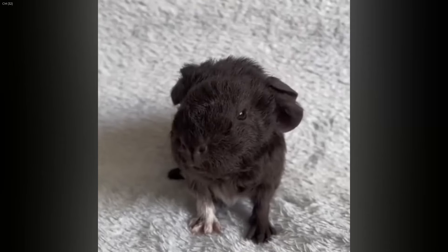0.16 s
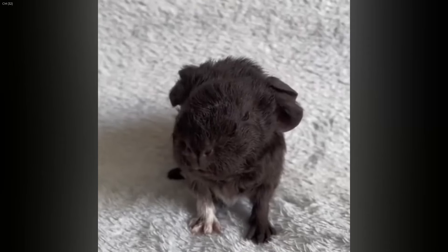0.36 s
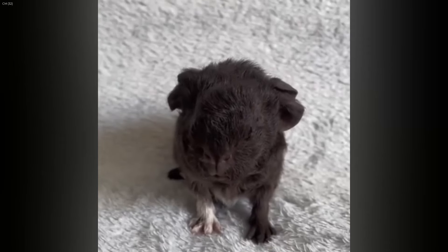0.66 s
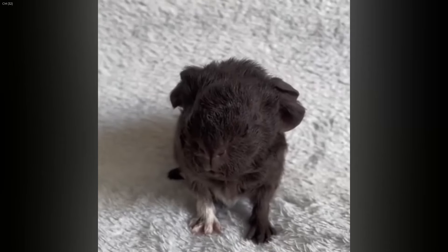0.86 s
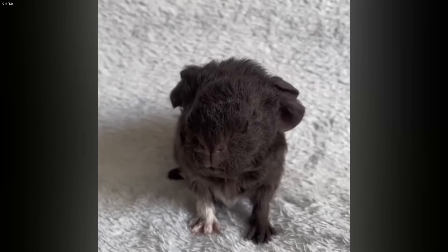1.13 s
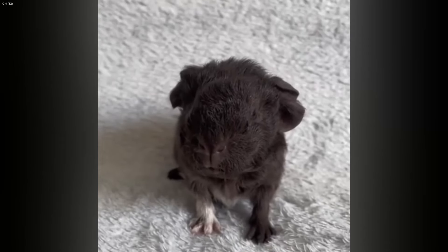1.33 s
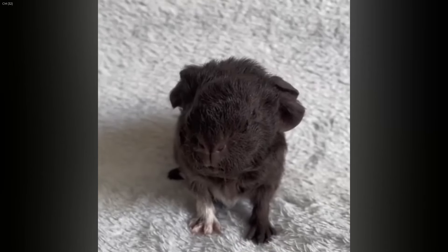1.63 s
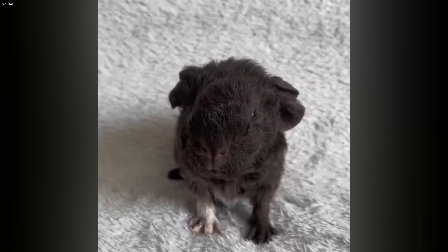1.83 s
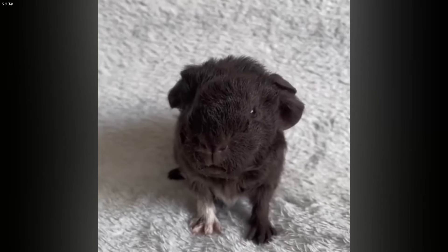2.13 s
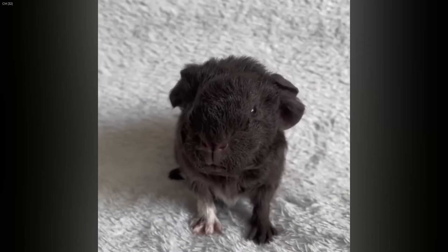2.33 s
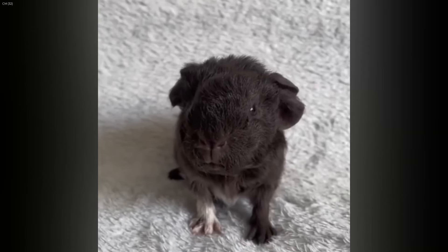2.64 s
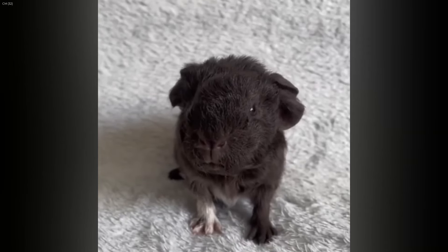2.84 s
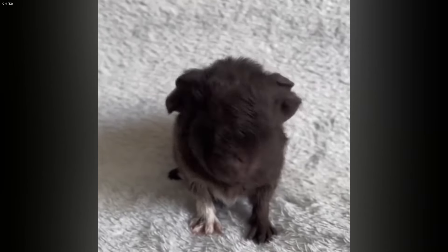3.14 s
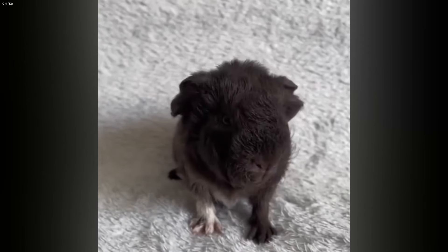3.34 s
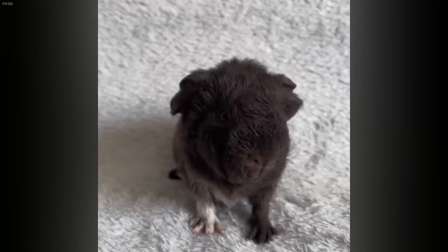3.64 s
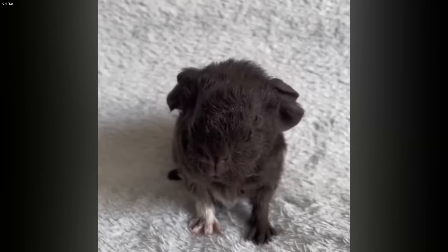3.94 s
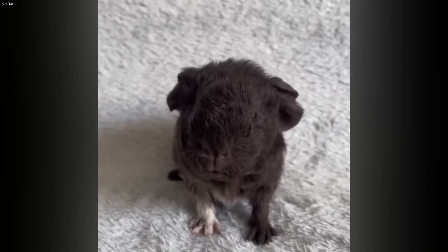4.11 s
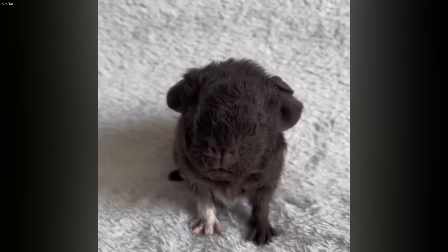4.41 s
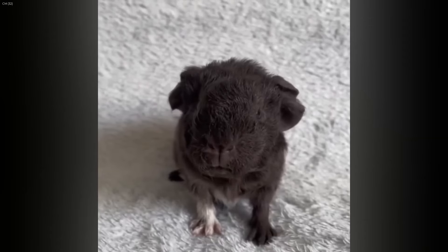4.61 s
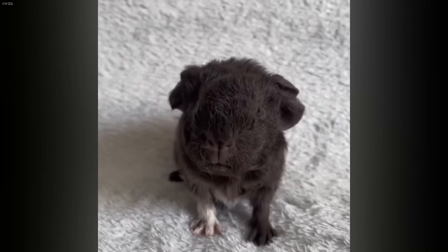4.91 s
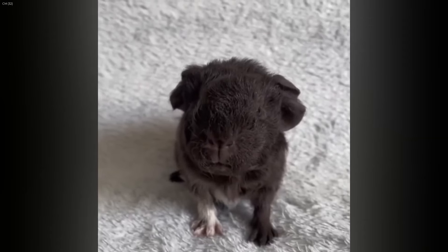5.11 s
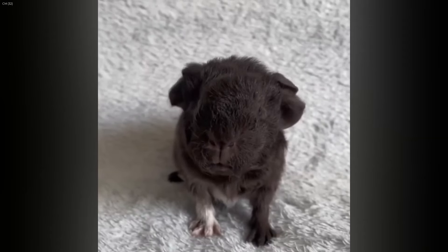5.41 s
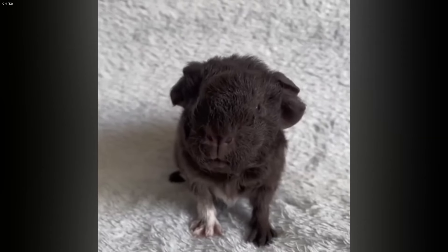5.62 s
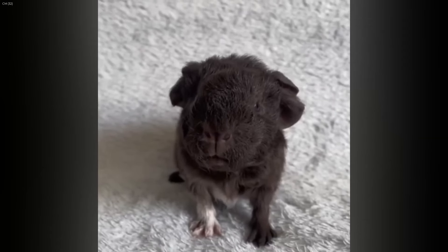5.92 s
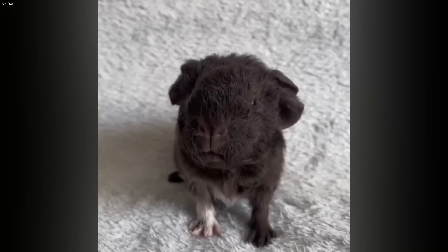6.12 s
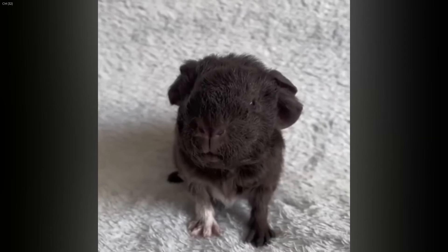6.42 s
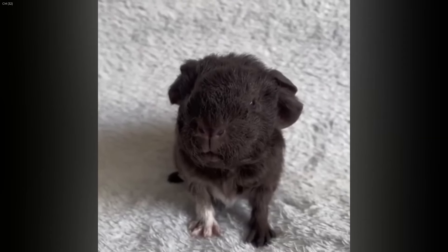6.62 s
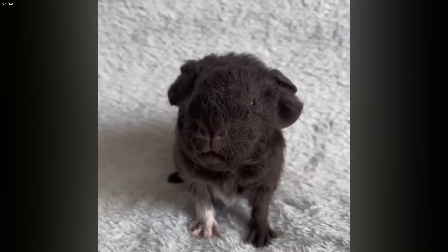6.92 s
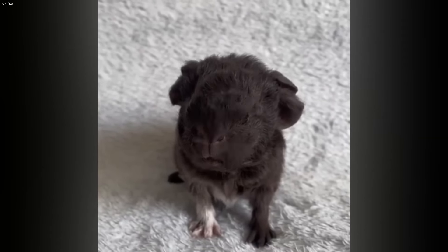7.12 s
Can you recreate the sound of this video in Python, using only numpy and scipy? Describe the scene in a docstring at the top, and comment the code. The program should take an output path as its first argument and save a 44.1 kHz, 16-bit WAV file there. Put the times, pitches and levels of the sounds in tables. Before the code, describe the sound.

A guinea pig on a soft blanket wheeks insistently, close to the microphone, over three times a second. Each call starts as a low nasal buzz, rasps briefly upward and locks into a thin, bright whistle. Around one to two seconds the calls weaken and fall back, then strengthen again, with one short break near three seconds. Faint low hum and a very short, dry room tail.

```python
"""Guinea pig wheeking on a blanket

A guinea pig wheeks over three times a second, close by in a quiet room.
Each wheek is one voice tone led along a pitch curve: a low nasal buzz rich in overtones
sweeps up through a noisy rasp into a thin, almost pure whistle; some fall back again.
Chirps, low notes, narrow bands of high noise, steady high tones and soft bumps join in.
Random reflections make the short room tail; sines and noise make the low hum and room tone."""
import sys
import numpy as np
from scipy import signal
from scipy.fft import rfft, irfft, next_fast_len
from scipy.io import wavfile
from scipy.ndimage import uniform_filter1d

SR = 44100
rng = np.random.default_rng(int(sys.argv[2]) if len(sys.argv) > 2 else 0)


def int16_out(signal):
    """Quantize to a 16-bit WAV file."""
    q = np.round(np.clip(np.atleast_2d(signal).T, -1, 1) * 32767)
    wavfile.write(sys.argv[1], SR, q.astype(np.int16))


N = 319983
EDGE_HZ = 15900  # upper limit of the overtones and of the final sound


def gain_of(db):
    """Turns decibels into an amplitude factor."""
    return 10 ** (np.asarray(db) / 20)


def evened(x):
    """Scales a sound to an average (rms) strength of 1."""
    return x / np.sqrt(np.mean(x ** 2) + 1e-20)


def read(points, hz, order=1):
    """Reads one column of a frequency table, in straight lines over log frequency."""
    columns = np.transpose(points)
    return np.interp(np.log(hz + 1), np.log(columns[0] + 1), columns[order])


def add(mix, s, sound):
    """Adds a sound into the mix at a time in seconds."""
    part = mix[max(round(s * SR), 0):][:len(sound)]
    part += sound[:len(part)]


def coloured(x, gain):
    """Filters a sound by a gain that depends on frequency."""
    size = next_fast_len(len(x) + SR // 20)
    spectrum = rfft(x, size) * gain(np.fft.rfftfreq(size, 1 / SR))
    return irfft(spectrum, size)[:len(x)]


def wobble(count, rate_hz):
    """Smooth random movement of rms 1, mostly slower than the rate."""
    noise = rng.standard_normal(count)
    return evened(coloured(noise, lambda f: np.exp(-(f / rate_hz) ** 2)))


def band(count, centre_hz, width_hz):
    """Noise of rms 1 gathered around one frequency, like a steep resonance."""
    noise = rng.standard_normal(count)
    return evened(coloured(noise, lambda f: (1 + ((f - centre_hz) / width_hz) ** 2) ** -2))


def background(waver=0.44, drift_radians=0.82, side_share=0.65):
    """Steady noise with low sines that waver in strength and phase; its bass is alike in both ears."""
    # noise of the room, middle part: (frequency [Hz], level [dB per Hz])
    room_tone = [(30, -99), (58, -78.5), (80, -87), (150, -87), (200, -97), (270, -91.5), (330, -103),
                 (450, -107), (1000, -119), (4000, -124), (7000, -135)]
    # hum of the room: (pitch [Hz], level before wavering [dB])
    hum = [(47.7, -54), (108, -71.5), (148, -72.5)]
    t = np.arange(N) / SR
    tone = lambda f: gain_of(read(room_tone, f)) * np.sqrt(SR / 2)
    mid = coloured(rng.standard_normal(N), tone)
    for hz, db in hum:
        phase = 2 * np.pi * hz * t + drift_radians * wobble(N, 5.6)
        strength = 1 + waver * wobble(N, 4.9)
        mid += np.sqrt(2) * gain_of(db) * strength * np.sin(phase)
    # the difference between the ears has little bass
    side_gain = lambda f: tone(f) * f ** 4 / (f ** 4 + 260 ** 4)
    side = side_share * coloured(rng.standard_normal(N), side_gain)
    return np.array([mid + side, mid - side])


def slipped(t):
    """The factor by which brief cracks in the voice bend its pitch at these times."""
    # slips of the voice: (middle [s], half-length [s], pitch change [share])
    slips = [(0.158, 0.0073, -0.042), (0.169, 0.00885, -0.036), (0.446, 0.006, 0.063),
             (0.8, 0.00404, -0.12), (0.807, 0.00665, 0.191), (1.3373, 0.009, 0.29), (1.389, 0.00804, 0.174),
             (1.593, 0.00482, 0.34), (1.717, 0.00636, 0.068), (2.207, 0.0054, 0.074),
             (2.235, 0.0167, -0.0222), (2.264, 0.0057, -0.016), (2.505, 0.00375, 0.024),
             (2.55, 0.0078, -0.0476), (2.813, 0.00573, 0.052), (2.846, 0.00735, -0.023),
             (3.25, 0.00824, 0.058), (3.291, 0.0036, -0.068), (3.578, 0.00915, -0.072),
             (3.9, 0.0074, -0.0055), (4.162, 0.0039, .018), (4.169, 0.00775, -0.021), (4.456, 0.012, .08),
             (4.516, 0.0101, -0.031), (5.051, 0.0028, -0.152), (5.308, 0.00603, -0.14),
             (5.422, 0.00376, 0.0565), (5.668, 0.00705, 0.021), (5.688, 0.0162, -0.1595),
             (6.774, 0.0056, 0.000042), (6.776, 0.00903, -0.078), (7.08, 0.0138, 0.0407),
             (7.115, 0.0093, -0.0069)]
    return 1 + sum(share * np.exp(-np.abs((t - s) / half) ** 3) for s, half, share in slips)


def voice(t, hz, db, mouth, effort_db,
          second_db=-38, slope_db=-8,  # whistle's second overtone; buzz's slope per octave of overtone
          split=0.5, muffling=0.93,
          near_db=-31, near_hz=450, high_db=-35,  # noise near the tone and in high bands, relative to it
          rasp_db=-54, air_db=-72, onset_db=-65, onset_fall=0.0037, rasp_rise=.025, rasp_fall=0.0249,
          buzz_from_hz=5000, buzz_full_hz=6500,  # effort brightens overtones from here to here
          muting_db=85, nasal_hz=1900, whistle_hz=3380,
          lock_hz=3650, hiss_db=-62, hiss_hz=11500, locked_db=-31,
          attack=.006, release=0.002,  # seconds
          jitter=.007, sweep_jitter=.014, flutter=.2,  # shares, scaled by the register or overtone
          uneven_db=2.5, ragged_db=4, ragged_hz=300):
    """Vocal folds follow a pitch and a level: many overtones when low, an almost pure whistle when high."""
    # gain of throat and nose on the overtones: (frequency [Hz], gain [dB])
    throat = [(800, 2.5), (1250, -4.5), (1700, 0), (2050, 5), (2550, -15.5), (3300, -17), (4050, -1.5),
              (4700, 2), (5300, -4.5), (6000, -13), (6800, -25.5), (9000, -23.5), (16000, -32)]
    # colour of the rasp, only its shape counts: (frequency [Hz], relative level [dB per Hz])
    rasp_colour = [(300, -15), (600, -3.5), (1900, -0.5), (2700, 0), (4400, 1.5), (5300, -0.5),
                   (6100, -13.5), (7800, -22.5), (10000, -14.5), (15500, -26)]
    # colour of the high noise that follows the whistle, only its shape counts:
    # (frequency [Hz], relative level [dB per Hz])
    high_colour = [(7400, -25.5), (8300, 2), (9000, -15.5), (10000, -1.5), (10700, -23), (13500, -29),
                   (14200, 0), (14900, -27.5)]
    count = len(t)
    whistling = np.clip((hz - whistle_hz) / 420 + .5, 0, 1)

    # the folds are least steady between the two registers, buzz and whistle
    sweeping = np.exp(-(np.log(hz / 1900) / 0.6235) ** 2) * (1 - whistling)
    shaking = sweeping + .15 * (1 - whistling)
    drifting = (1 - .7 * whistling) * wobble(count, 70)
    unsteady_hz = hz * (1 + jitter * drifting + sweep_jitter * shaking * wobble(count, 500))
    turns = np.cumsum(unsteady_hz) / SR

    # when the fundamental crosses the throat's valley, the overtones keep their strength
    source_db = -muffling * read(throat, hz)
    folds = np.sin(2 * np.pi * turns)
    for k in range(2, 20):
        partial_hz = k * hz
        buzzing_db = source_db + slope_db * np.log2(k) + read(throat, partial_hz / mouth)
        buzzing_db += uneven_db * wobble(count, 37)
        brightened = np.clip((partial_hz - buzz_from_hz) / (buzz_full_hz - buzz_from_hz), 0, 1)
        buzzing_db += effort_db * (1 - sweeping) * brightened
        # a narrow mouth mutes the nasal resonance
        buzzing_db += muting_db * min(mouth - 1, 0) * np.exp(-((partial_hz - nasal_hz) / 400) ** 2)
        whistled_db = second_db if k == 2 else -60
        gain = gain_of((1 - whistling) * buzzing_db + whistling * whistled_db) * (partial_hz < EDGE_HZ)
        # the highest overtones are the least steady
        shake = wobble(count, 200) + 1j * wobble(count, 200)
        unsteady = flutter * np.minimum(partial_hz / 4000, 3) * shake
        folds += gain * ((1 + unsteady) * np.exp(2j * np.pi * k * turns)).imag

    # between the registers strong and weak cycles alternate in fits, adding strands between the overtones
    folds *= 1 + split * sweeping * wobble(count, 220) * np.cos(np.pi * turns)
    # there the tone also stutters, sagging in brief, uneven gaps
    folds *= gain_of(ragged_db * sweeping * np.minimum(wobble(count, ragged_hz), .5))

    # turbulence builds toward each register break and lingers after it, in one puff a cycle
    u = t - t[0]
    lingering = np.maximum.accumulate(sweeping * np.exp(u / rasp_fall)) * np.exp(-u / rasp_fall)
    ahead = np.maximum.accumulate((sweeping * np.exp(-u / rasp_rise))[::-1])[::-1]
    building = ahead * np.exp(u / rasp_rise)
    pulsing = 1 + 1.4 * np.cos(2 * np.pi * turns)
    puffs = rng.standard_normal(count) * pulsing * gain_of(2.2 * wobble(count, 120))
    rasp = evened(coloured(puffs, lambda f: gain_of(read(rasp_colour, f))))
    turbulence = gain_of(rasp_db) * np.maximum(lingering, building) + gain_of(air_db) * (1 - whistling)
    # a small puff escapes as the folds first part
    first_puff = gain_of(onset_db) * np.exp(-u / onset_fall)
    rasp *= gain_of(0.13 * effort_db) * turbulence + first_puff
    # air hisses through the folds as they lock into the whistle
    locking = np.exp(-((hz - lock_hz) / 550) ** 2) * np.clip((locked_db - db) / 10, 0, 1)
    rasp += gain_of(hiss_db + effort_db) * locking * band(count, hiss_hz, hiss_hz / 2)
    rasp *= np.clip((t[-1] - t) / rasp_fall, 0, 1)

    # noise near the whistle's tone and in fixed high bands follows its level
    high_noise = evened(coloured(rng.standard_normal(count), lambda f: gain_of(read(high_colour, f))))
    spread = wobble(count, near_hz) + 1j * wobble(count, near_hz)
    near_noise = (spread * np.exp(2j * np.pi * turns)).real
    noise = whistling * (gain_of(db + near_db) * near_noise + gain_of(db + high_db) * high_noise)
    gate = np.clip(np.minimum(u / attack, (t[-1] - t) / release), 0, 1)
    return gate * (np.sqrt(2) * gain_of(db) * folds + rasp + noise)


def wheek(start, to_sweep, width, to_crest, fall, onset_hz, early_hz, middle_hz, scoop_hz,
          first_hz, crest_hz, end_hz, bend, swell, top_db, mouth, effort_db):
    """A wavering buzz sweeps along an S-curve into a whistle that swells, moves to a crest and falls."""
    # buzz: where its four pitches lie (shares of the time to the sweep), and its raised onset pitch
    buzz_places, flick, flick_s = (.08, .28, .52, .76), 0.28, 0.0018
    # buzz: base level, softer start, and loss as the sweep begins
    buzz_db, soft_start_db, soft_start_s, sag_db, sag_share = -34.5, 10.5, 0.01283, 9, 0.1596
    # effort: usual value, and how much any extra changes the level of the buzz and of the sweep
    usual_effort_db, buzz_effort, sweep_effort = 2.5, 0.13, 0.06
    # whistle: level it swells from, loss by its end, level after falling far, shimmer
    lock_db, fade_db, fallen_db, shimmer_db = -50.5, 7.5, -50, 1.1
    # whistle pitch: scale of a late climber's sag, waver (share), rate of waver and shimmer
    droop, waver, waver_hz = .112, 0.0023, 60
    # break: place and width in the sweep (shares), scales of its dip and pitch flip, effort that halves it
    break_share, break_width, break_dip_db, break_flip, half_effort_db = 0.945, 0.027, 9, .04, -12

    t = np.arange(0, to_sweep + to_crest + fall, 1 / SR)
    since = t - to_sweep
    swept = .5 + .5 * since / np.hypot(since, width)
    held = np.clip(since / to_crest, 0, 1)
    fallen = np.clip((since - to_crest) / fall, 0, 1) ** 2

    low_hz = np.interp(t / to_sweep, buzz_places, [onset_hz, early_hz, middle_hz, scoop_hz])
    low_hz = uniform_filter1d(low_hz, size=SR // 100) * (1 + flick * np.exp(-t / flick_s))
    high_hz = first_hz * (crest_hz / first_hz) ** (held ** bend) * (end_hz / crest_hz) ** fallen
    sagging = droop * (1 - 1 / bend) * np.sin(np.pi * held)
    high_hz *= 1 - sagging + waver * wobble(len(t), waver_hz)

    low_db = buzz_db - soft_start_db * np.exp(-t / soft_start_s)
    low_db -= sag_db * np.minimum(swept / sag_share, 1)
    low_db += (effort_db - usual_effort_db) * (buzz_effort + sweep_effort * swept)
    swelling = np.sin(np.pi / 2 * np.clip(since / swell, 0, 1)) ** 2
    high_db = lock_db + (top_db - lock_db) * swelling
    high_db -= fade_db * fallen
    high_db += (fallen_db - high_db) * np.clip(1.5 * np.log2(crest_hz / end_hz) * fallen, 0, 1)
    high_db += shimmer_db * wobble(len(t), waver_hz)
    locked = np.clip((swept - .7) / 0.039, 0, 1)

    # a strained voice overshoots, dips and catches again a little lower
    past_break = (swept - break_share) / break_width
    broken = np.clip(1.5 - effort_db / half_effort_db, 0, 1.5) * np.exp(-past_break ** 2)
    flip = 1 + break_flip * broken * (.5 - np.tanh(8 * past_break))
    db = low_db + (high_db - low_db) * locked - break_dip_db * broken
    hz = low_hz * (high_hz / low_hz) ** swept * flip * slipped(start + t)
    return start, voice(t, hz, db, mouth, effort_db)


def low_note(s, hz, db, length=.09, waver=0.06):
    """A soft, low sine whose pitch wavers at random, centred on its time."""
    count = round(length * SR)
    turns = np.cumsum(hz * (1 + waver * wobble(count, 60))) / SR
    return s - length / 2, np.sqrt(2) * gain_of(db) * np.hanning(count) * np.sin(2 * np.pi * turns)


def bump(s, db, hz, rise=0.01):
    """A dull push on the blanket: low noise that rises quickly and dies away."""
    u = np.arange(SR // 5) / SR / rise
    return s, gain_of(db) * u * np.exp(1 - u) * band(len(u), hz, hz / 2)


def chirp(start, length, first_hz, middle_hz, last_hz, db, mouth, effort_db, ends_db=-5):
    """The same voice on one short pitch curve through three points, loudest in the middle."""
    t = np.arange(0, length, 1 / SR)
    place = 2 * t / length - 1
    curve = np.polyfit([-1, 0, 1], np.log([first_hz, middle_hz, last_hz]), 2)
    hz = np.exp(np.polyval(curve, place))
    return start, voice(t, hz * slipped(start + t), db + ends_db * place ** 2, mouth, effort_db)


def noise_band(start, length, hz, glide_hz, width_hz, db, edge=0.0035):
    """A rough, narrow band of high noise with quick edges; its pitch may glide."""
    t = np.arange(0, length, 1 / SR)
    gate = np.clip(np.minimum(t, length - t) / edge, 0, 1)
    climb = np.exp(2j * np.pi * np.cumsum(glide_hz * (t / length - .5)) / SR)
    noise = rng.standard_normal(len(t))
    rough = evened(coloured(noise, lambda f: np.exp(-np.abs((f - hz) / width_hz) ** 3)))
    # turning the phase shifts the whole band up or down
    return start, gain_of(db) * gate * (signal.hilbert(rough) * climb).real


def steady_tone(start, length, hz, db, edge=0.0097):
    """A pure, steady high sine with quick edges."""
    t = np.arange(0, length, 1 / SR)
    gate = np.clip(np.minimum(t, length - t) / edge, 0, 1)
    return start, np.sqrt(2) * gain_of(db) * gate * np.sin(2 * np.pi * hz * t)


def microphones(x):
    """Two microphones share the close sounds unequally, depending on frequency."""
    # balance at the microphones: (frequency [Hz], left minus right [dB])
    balance = [(550, 0.5), (720, 2), (950, -4), (1250, -30), (1600, -1.5), (2300, 2.5), (3100, -5.5),
               (4000, -1.5), (5000, 1)]
    left_share = lambda f: 1 / (1 + gain_of(-read(balance, f)))
    left = 2 * coloured(x, left_share)
    return np.array([left, 2 * x - left])


def tail(x, side, side_t60_share=0.674):
    """Sparse reflections of random sign, each band dying at its own speed; the side part dies sooner."""
    # the room's tail: (frequency [Hz], time for the middle part to fall 60 dB [s],
    # middle level [dB], side level [dB])
    room_bands = [(530, 0.35, -24.5, -7), (700, 0.11, -19, -5), (1230, 0.42, -24, -9),
                  (2450, 0.1, -6.5, -13), (4700, 0.1232, -22.5, -18), (9000, 0.14, -21.5, -20),
                  (15000, 0.1, -14, -11)]
    taps = np.zeros(SR // 2)
    at = np.arange(SR // 300, len(taps) - 20, 20)
    taps[at + rng.integers(0, 20, len(at))] = rng.choice([-1., 1.], len(at))
    hz, t, z = signal.stft(taps, SR, nperseg=256)
    t60 = read(room_bands, hz) * (side_t60_share if side else 1)
    decay = gain_of(-60 * t / t60[:, None])
    # dividing by the energy keeps a band's level apart from its decay
    energy = np.mean(decay[:, 1:] ** 2, axis=1) * len(at)
    gain = gain_of(read(room_bands, hz, order=3 if side else 2)) / np.sqrt(energy)
    response = signal.istft(z * decay * gain[:, None], SR, nperseg=256)[1]
    return signal.fftconvolve(x, response)[:N]


def room(x):
    """A short tail: a part shared by both ears plus a side part of opposite sign in each."""
    mid, side = tail(x, side=False), tail(x, side=True)
    return np.array([mid + side, mid - side])


def scene():
    """Sums the voice, low notes, bumps, noise bands and high tones, colours them, adds room and background."""
    # All levels here are before the colour of the microphones.
    # wheeks: (start [s], time to the sweep's middle [s], sweep half-width [s], time on to the crest [s],
    # fall [s], buzz's onset pitch [Hz], early pitch [Hz], middle pitch [Hz], scooping pitch [Hz],
    # whistle's first pitch [Hz], crest pitch [Hz], end pitch [Hz], climb exponent [1 even, more = late],
    # whistle's swell [s], level it swells to [dB], mouth opening [factor on the throat], effort [dB])
    wheeks = [(0.02, 0.1026, 0.012, 0.08874, 0.0289, 566.4, 671.6, 638.4, 695, 4030, 4907, 4734, 1.08, 0.1193, -33.5, 0.953, 3.5),
              (0.328, 0.0977, 0.0112, 0.06736, 0.044, 602, 685, 675.4, 700, 3975, 4906, 4557, 1.063, 0.094, -33, 0.957, 5),
              (0.618, 0.09815, 0.0067, 0.0532, 0.0261, 586.5, 675, 677.6, 698.2, 3699, 4394, 1580, 1.106, 0.0472, -35.5, 0.955, -0.5),
              (0.907, 0.09966, 0.0097, 0.0633, 0.0261, 728, 620, 637, 700, 4819, 4500, 2750, 0.887, 0.0228, -32.5, 0.926, -8),
              (1.182, 0.1088, 0.0085, 0.0193, 0.0432, 616, 641, 616.5, 668, 3844, 4308, 958, 0.98, 0.023, -38.5, 0.91, -8.5),
              (1.489, 0.1122, 0.008, 0.0173, 0.0272, 704.5, 591.7, 639.3, 620.1, 3904, 4100, 610, 1, 0.029, -43, 0.889, -13.5),
              (1.639, 0.0479, 0.005, 0.00862, 0.028, 940, 576, 643, 700, 3350, 3336, 1510, 1.01, 0.012, -48, 0.908, -7.5),
              (1.813, 0.1086, 0.0072, 0.0114, 0.0253, 692, 611.3, 634.5, 683.9, 3900, 3680, 3680, 1.02, 0.018, -49.5, 0.896, -13.5),
              (2.079, 0.0788, 0.016, 0.11485, 0.01005, 701, 611, 609.5, 792.7, 4018, 4509, 4170, 3.88, 0.065, -30, 0.899, -4.5),
              (2.389, 0.09737, 0.0093, 0.0899, 0.0107, 619, 647, 647.3, 675.8, 3761, 4581, 4400, 0.91, 0.086, -40.5, 0.94, 2),
              (2.684, 0.10085, 0.0105, 0.0838, 0.0161, 635, 655, 577.9, 695.4, 4330, 4423, 3930, 1.017, 0.0304, -35, 0.924, -6),
              (3.172, 0.10393, 0.0082, 0.0344, 0.0225, 691, 564, 563.7, 623.8, 4030, 4257, 3580, 1.46, 0.0507, -43, 0.908, -15.5),
              (3.431, 0.10294, 0.0162, 0.0543, 0.01806, 681, 585, 589.7, 573.2, 3538, 4689, 4150, 0.877, 0.099, -38, 0.902, -16),
              (3.711, 0.1123, 0.0127, 0.0324, 0.038, 628.5, 582, 609.9, 623.1, 3458, 4176, 1780, 0.85, 0.071, -41.5, 0.901, -16.5),
              (4.006, 0.0952, 0.014, 0.05975, 0.0458, 733, 658.7, 684.9, 754.4, 4325, 4227, 3890, 0.97, 0.0718, -31, 0.935, 3.5),
              (4.31, 0.10106, 0.012, 0.11964, 0.0161, 582, 627, 588.5, 680.2, 4594, 4880, 4590, 5.9, 0.0934, -25.5, 0.922, -11),
              (4.642, 0.10294, 0.012, 0.0776, 0.0209, 630, 665, 657, 699.5, 4723, 4587, 4144, 1.4, 0.084, -35, 1.039, 9.5),
              (4.936, 0.09516, 0.0111, 0.0746, 0.0117, 650, 675.5, 642.4, 693.7, 4822, 4681, 4030, 1.3, 0.0545, -32, 0.925, -0.5),
              (5.21, 0.08564, 0.0088, 0.12, 0.0127, 608.5, 661, 643.4, 736.3, 4230, 4774, 4800, 1.164, 0.0632, -21.5, 0.9114, 10),
              (5.512, 0.1018, 0.009, 0.103, 0.017, 654, 721.6, 726.6, 726.2, 4320, 3990, 3013, 0.89, 0.028, -45.5, 1.125, 5),
              (5.823, 0.0973, 0.012, 0.06176, 0.0259, 703, 709, 709, 741.3, 4029, 5131, 4320, 0.937, 0.066, -27.5, 1.096, 11.5),
              (6.097, 0.09834, 0.009, 0.0659, 0.0287, 630, 705, 660.1, 742.8, 4747, 4619, 1360, 1.115, 0.0684, -29.5, 0.945, 7.5),
              (6.372, 0.10594, 0.0059, 0.0311, 0.05, 655, 651, 654.8, 713.4, 4360, 4482, 863, 0.916, 0.0132, -32.5, 0.9204, -9.5),
              (6.653, 0.0888, 0.0095, 0.0778, 0.02106, 779, 630, 643.1, 655.7, 4047, 4935, 4530, 0.826, 0.072, -32, 0.8965, 1),
              (6.941, 0.09487, 0.014, 0.103, 0.01895, 663, 640, 654.5, 720.4, 4421, 4741, 4700, 8, 0.0475, -26, 0.907, 12)]
    # faint notes under and between the wheeks: (middle [s], pitch [Hz], level [dB])
    low_notes = [(0.18, 643, -69.5), (1.045, 598, -60.5), (1.09, 536.7, -64), (1.62, 495.8, -60),
                 (1.92, 530, -59.5), (2.18, 558.6, -66.5), (2.93, 553.5, -67.5), (3.13, 550.9, -64),
                 (3.37, 550.8, -73.5), (4.235, 558.2, -68), (5.06, 574.5, -58), (6.26, 561, -63.5),
                 (6.54, 545.6, -57), (6.916, 539.8, -58.5), (7.134, 553.4, -61)]
    # soft bumps as the animal shifts: (start [s], level [dB], centre [Hz])
    bumps = [(0.327, -65, 96.5), (2.951, -58.5, 200.5), (2.954, -54, 450)]
    # chirps, mostly tacked on to a wheek that has fallen back: (start [s], length [s], first pitch [Hz],
    # middle pitch [Hz], last pitch [Hz], level [dB], mouth opening [factor on the throat], effort [dB])
    chirps = [(0.784, 0.0423, 1842, 1824, 796.5, -43.5, 0.965, 14.5),
              (1.343, 0.05454, 1277, 998.6, 1507, -44, 0.934, 8),
              (2.992, 0.06245, 700, 593, 735.7, -38, 0.8774, -14),
              (3.887, .034, 1510, 1507, 1065, -47.5, 1, 2.5),
              (6.544, 0.02874, 1032, 848.6, 880.7, -43, 0.95, 10.5)]
    # rough, narrow bands of high noise during some whistles: (start [s], length [s], centre [Hz],
    # climb over its length [Hz], width [Hz], level [dB])
    noise_bands = [(2.186, 0.102, 7760, 0.5, 119.4, -50), (2.818, 0.036, 8230, -0.5, 296.7, -63),
                   (2.259, 0.0114, 7615, -2, 455.4, -30.5), (2.262, 0.0221, 9758, 3, 454, -40.5),
                   (2.264, 0.018, 13990, 0, 397.4, -54), (4.14, 0.0716, 8158, 14, 417, -40.5),
                   (4.431, 0.044, 8310, -1.5, 450, -47.5), (4.464, 0.0562, 8140, -4.5, 424, -31.5),
                   (4.483, 0.0447, 14110, 599.5, 299.4, -48.5), (4.516, 0.0108, 9885, 6.5, 252, -42),
                   (5.327, 0.041, 8174, 0.5, 400, -46), (5.336, 0.078, 14100, 600, 199, -40.5),
                   (5.362, .055, 9855, -0.5, 219.2, -48.5), (5.939, 0.0295, 9960, 5.5, 300, -52),
                   (5.968, 0.0382, 10370, 1.5, 306, -53), (7.1, 0.038, 8080, -5.5, 450, -43),
                   (7.125, 0.0434, 9800, 10, 300, -48.5), (7.126, 0.0302, 14050, 0, 298.3, -56.5)]
    # thin, steady high tones sounding during a few whistles:
    # (start [s], length [s], pitch [Hz], level [dB])
    steady_tones = [(5.337, 0.089, 9130, -27), (5.659, 0.062, 6715, -60.5), (5.662, 0.042, 10340, -74),
                    (7.056, 0.0356, 11900, -37)]
    # colour common to both microphones: (frequency [Hz], gain [dB])
    mic_colour = [(5400, 0.5), (6500, 2), (7400, -11), (8300, -5), (9400, 3.5), (12500, -5), (14200, 3.5),
                  (15500, -13)]
    close_sounds = np.zeros(N)
    for row in wheeks:
        add(close_sounds, *wheek(*row))
    for row in low_notes:
        add(close_sounds, *low_note(*row))
    for row in bumps:
        add(close_sounds, *bump(*row))
    for row in chirps:
        add(close_sounds, *chirp(*row))
    for row in noise_bands:
        add(close_sounds, *noise_band(*row))
    for row in steady_tones:
        add(close_sounds, *steady_tone(*row))
    close_sounds = coloured(close_sounds, lambda f: gain_of(read(mic_colour, f)))
    return microphones(close_sounds) + room(close_sounds) + background()


def record(dry):
    """Cuts the highest treble with a steep low-pass filter."""
    lowpass = signal.firwin(511, EDGE_HZ, window=("kaiser", 9), fs=SR)
    return signal.oaconvolve(dry, lowpass[None], "same", axes=1)


dry = scene()
out = record(dry)
int16_out(out)
```